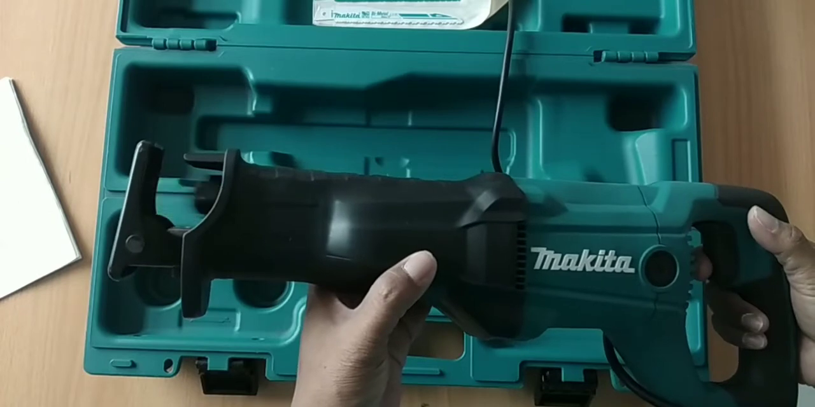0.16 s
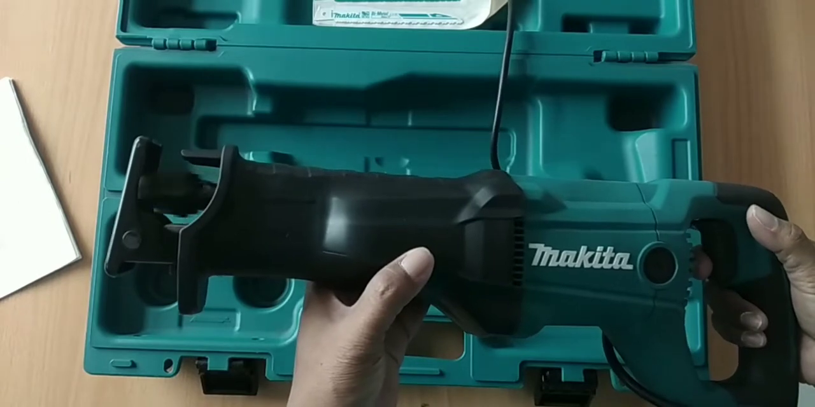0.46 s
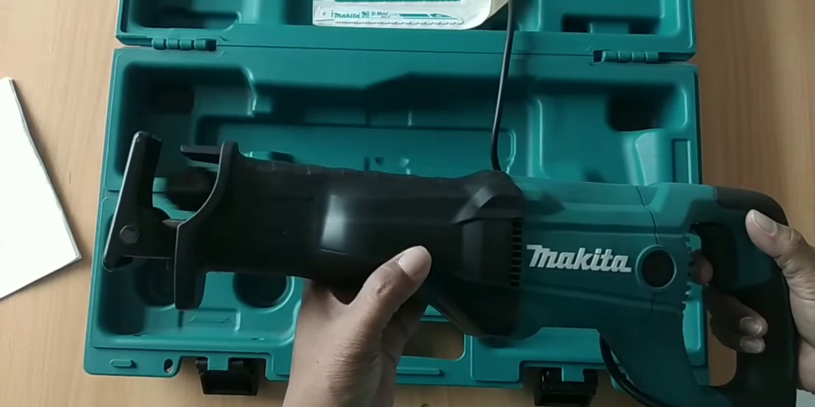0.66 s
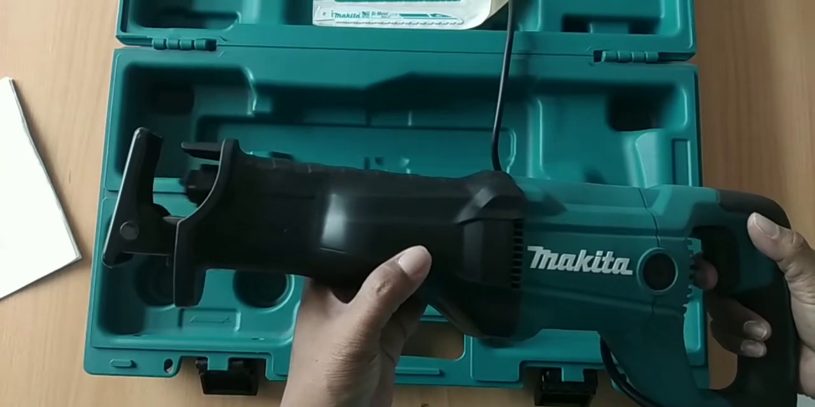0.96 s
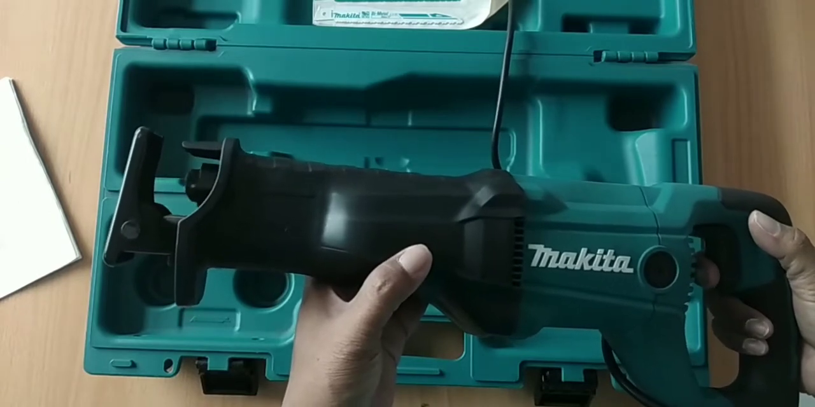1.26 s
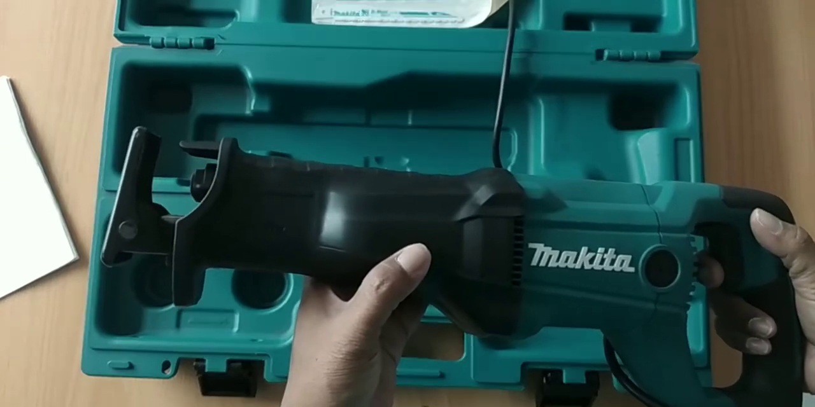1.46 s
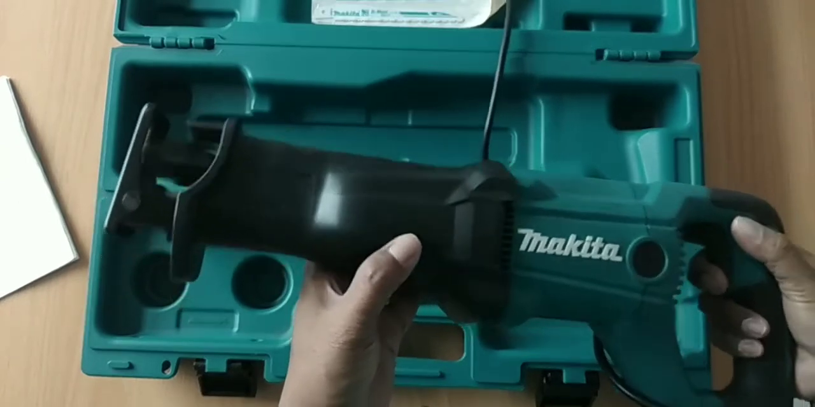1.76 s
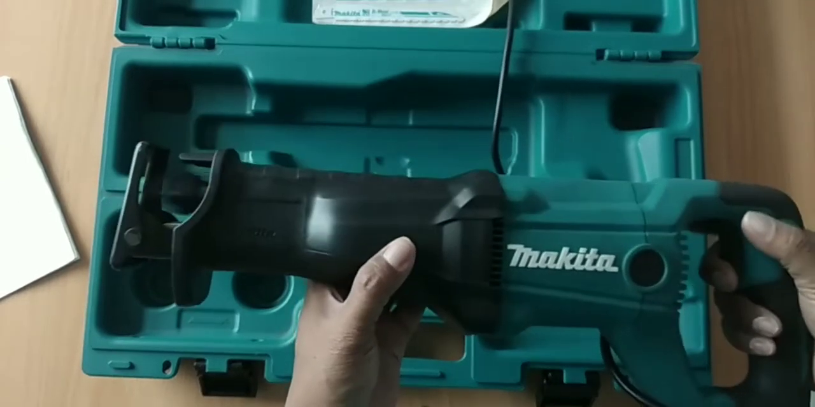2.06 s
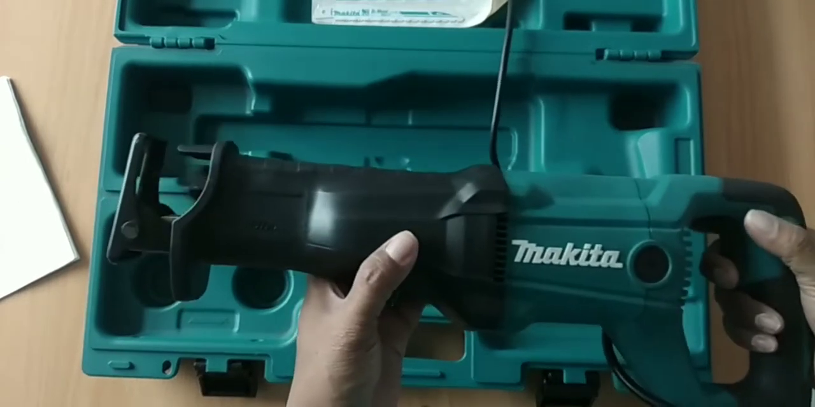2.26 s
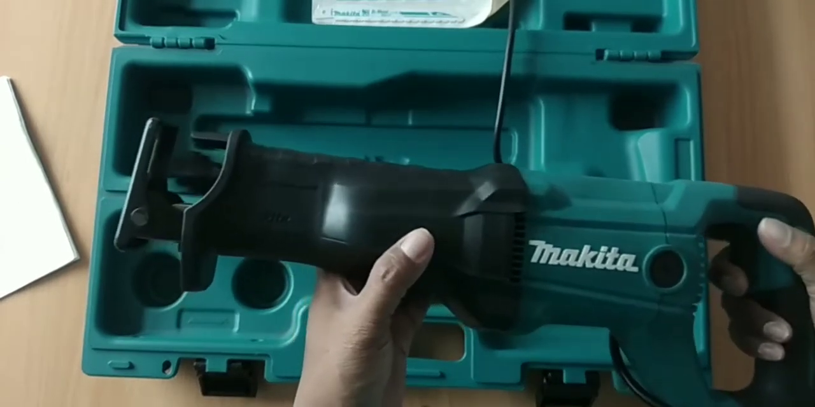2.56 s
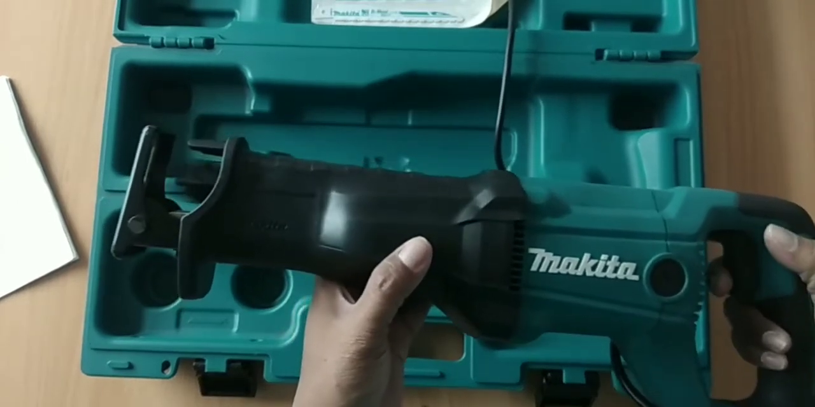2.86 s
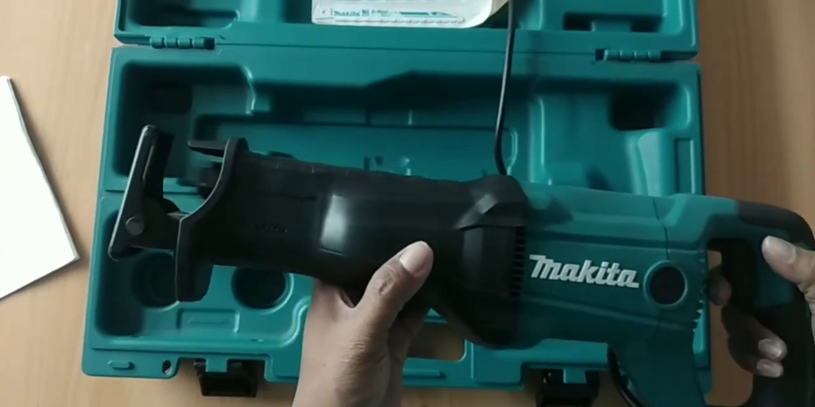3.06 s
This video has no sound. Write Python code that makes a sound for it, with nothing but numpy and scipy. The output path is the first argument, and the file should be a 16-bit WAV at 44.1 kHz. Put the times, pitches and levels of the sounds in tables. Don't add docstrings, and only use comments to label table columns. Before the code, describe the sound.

A bladeless reciprocating saw, very close in a small room, rattles down into sparse knocks and near quiet, then clicks on, roars up abruptly with airy hiss and whine, buffeting the stereo microphone mostly on the left.

```python
import sys
import numpy as np
from scipy import signal
from scipy.fft import rfft, irfft
from scipy.io import wavfile
from scipy.ndimage import uniform_filter1d

SR = 44100
rng = np.random.default_rng(int(sys.argv[2]) if len(sys.argv) > 2 else 0)


def materialize(psi):
    bounded = np.clip(np.atleast_2d(psi).T, -1, 1)
    quanta = np.round(bounded * 32767).astype(np.int16)
    wavfile.write(sys.argv[1], SR, quanta)


def rack_gain(trim_db):
    fader = np.asarray(trim_db, float)
    return 10 ** (fader / 20)


N = 141120
T = np.arange(N) / SR
HZ = np.fft.rfftfreq(512, 1 / SR)

# time_s, pitch_hz
MOTOR_SPEED = [(0, 6200), (.7, 3000), (1.3, 700), (1.5, 0), (1.56, 0), (1.62, 6500), (1.72, 12000),
               (1.82, 14500), (1.9, 15400), (2.0, 16150), (2.14, 16600), (2.27, 15750), (2.4, 14790),
               (2.53, 13860), (2.7, 12280), (2.86, 10700), (3.2, 7900)]
# time_s, level_db
DRIVE = [(0, -3), (.27, -9.5), (.6, -14.5), (.9, -20.5), (1.2, -34.5), (1.3, -44.5), (1.5, -89),
         (1.535, -37), (1.545, -29), (1.575, -19.5), (1.6, -9.5), (1.64, -2.5), (1.75, -1.5), (1.93, -1.5),
         (2.5, -1), (2.85, -1.5), (2.95, -2.5), (3.2, -2.5)]
# freq_hz, level_db
HISS_SPECTRUM = [(210, -29.5), (560, -4.5), (1300, -6), (2100, 2.5), (3300, -3.5), (6000, 1), (10000, 11.5),
                 (16000, 1)]
# freq_hz, share (dB per dB)
HISS_FOLLOW = [(200, 0.66), (1200, 0.9), (3500, 0.64), (7000, 0.94), (11000, 1.55), (16000, 3.1)]
# mode_hz, width_hz, level_db, drive_share (dB per dB)
HOUSING = [(357, 145, -20.5, 1.35), (653, 111, -12.5, 0.38), (1247, 154, -6, 0.34), (1474, 236, -4, 0.62),
           (2079, 114, -1.5, 0.6), (2310, 140, -8, 0.67), (3640, 510, -2.5, 0.94), (5270, 100, -5, 1.2),
           (6090, 127, 3.5, 1.37), (6980, 180, -5, 3.4), (7790, 860, 1.5, 2.5), (9800, 1100, -3, 1.12)]
# start_s, level_db, brightness (0-1)
KNOCKS = [(0.107, -11, 1), (.223, -10.5, 0.46), (.25, -17, .3), (.287, -12, 0.2), (0.357, -14, 0.4),
          (0.477, -15, 0.1), (0.538, -25, 0.4), (0.617, -13.5, 0.3), (.67, -14.5, 0.1), (.732, -15.5, 0.26),
          (.798, -31.5, 0.1), (0.835, -31.5, .1), (0.876, -31.5, .1), (.9, -18.5, 0), (0.92, -24, 0.1),
          (0.971, -23, 0.05), (1.033, -20, 0), (1.189, -35, 0.2), (1.281, -36, 0.12), (1.403, -37, 0.2),
          (1.476, -50, 0.8), (1.5377, -4.5, 0.17), (1.547, -30, 0.5), (1.555, -10.5, 0.34),
          (1.596, -7.5, 0), (1.645, -13, 0), (1.673, -18, 0)]
# order (multiple of commutator pitch), level_db, right_over_left_db (half the gap)
SHAFT_TONES = [
    (.137, -37, 0),
    (.04, -48, 2),
    (.0064, -54, 4),
]
# pitch_hz, level_db
COMMUTATOR_TONE = [(9500, -42), (10500, -26), (12200, -26), (13000, -34), (13900, -27), (14700, -24.5),
                   (15600, -24)]
# start_s, length_s, level_db, top_hz
LEFT_GUSTS = [(1.782, 0.031, -10.5, 500), (1.779, 0.045, -14, 170), (1.815, 0.052, -21.5, 408),
              (2.03, 0.065, -24, 400), (2.09, 0.14, -25.5, 366), (2.23, 0.052, -26, 303),
              (2.295, 0.045, -18.5, 518), (2.355, 0.036, -17.5, 455), (2.45, 0.047, -22.5, 520),
              (2.53, 0.061, -29, 300), (2.63, 0.032, -21.5, 505), (2.68, 0.0575, -23.5, 400),
              (2.76, 0.037, -18.5, 446), (2.8, 0.066, -23, 282), (2.86, 0.058, -22, 446),
              (2.91, 0.033, -22.5, 407)]
# start_s, length_s, level_db, top_hz
RIGHT_GUSTS = [
    (1.88, 0.046, -23.5, 204),
    (1.93, 0.17, -31.5, 120),
    (2.0, 0.28, -30.5, 151),
    (2.28, 0.084, -32, 120),
    (2.355, .04, -28, 150),
    (2.45, .15, -57, 120),
    (2.7, 0.24, -46, 120),
]
# freq_hz, gain_db
LEFT_PORT = [(1000, 1.5), (3300, -1.27), (5500, -2), (7700, 7), (9300, -9), (12000, -18.5), (14500, -3),
             (16000, -59)]
# freq_hz, gain_db
RIGHT_PORT = [(1000, 1), (3300, -4.5), (5500, -4.5), (8000, -5.8), (9600, -5.5), (11000, 4), (13000, 0.5),
              (16000, 6)]
# freq_hz, correlation (0-1)
PORT_LIKENESS = [(300, 1), (640, 0.78), (1410, 0.548), (3100, 0.25), (5500, 0.13), (8000, 0.22),
                 (11000, 0.76), (15000, 1)]
# freq_hz, phase_rad
PORT_PHASE = [(0, 0), (2150, .2), (3800, -.6), (4900, -1.5), (5700, -6.2), (7400, -11.3), (8400, -18.85),
              (15900, -18.85)]
# freq_hz, level_db
FLOOR_SPECTRUM = [(25, 3.5), (55, -4), (110, 0), (180, -7), (280, -9.5), (1200, -14.5), (6000, -21.5),
                  (16000, -27)]

HISS_DB, PATCHY_DB, FLICKER_DB, SWELL_DB = -12.5, 1.3, .9, .45
RATTLE_DB, RATTLE_FULL_DB, TEETH_PER_S, TOOTH_SPREAD_DB = -31, -8.5, 4500, 1.7
LASH_DB, LASH_HZ = 9.5, 10000
STROKE_DEPTH, STROKE_ORDER = .16, .00568
SLAP_AT_S, SLAP_DB, SLAP_SPREAD_DB, SLAP_S = 2.0005, -28, 2, .001
SLAP_SHARE, SLAP_WIDEN, SLAP_HZ = 1.67, 2.8, 2151
KNOCK_DB, KNOCK_BURST_S, KNOCK_TAIL_S, KNOCK_TAIL_DB = -2, .0028, .007, -18.5
FLOOR_DB, FLOOR_DUCK_DB, FLOOR_BACK_S = -51.5, -3, .46
HUM_HZ, HUM_DB, HUM_FROM_S, HUM_RISE_S = 263, -3.5, 1.0, .3
FLARE_S, FLARE_LENGTH_S, FLARE_HZ, FLARE_WIDTH_HZ, FLARE_DB = 1.577, .03, 6350, 450, -18.5
WHINE_FROM_HZ, WHINE_RISE_HZ, WHINE_SETTLES_S = 8000, 1500, 1.76
WAVER_DB, WHINE_PAN_DB = 2, 2.5
PUSH_S, PUSH_HZ, PUSH_DB = 1.777, 40.3, -10.5
GUST_FROM_HZ, SIDE_GUST_FROM_HZ = 300, 25
DRAUGHT_FROM_S, DRAUGHT_TO_S, DRAUGHT_DB, DRAUGHT_DROP_DB, DRAUGHT_HZ = 1.78, 2.95, -32, -5.5, 197
ROOM_DB, ROOM_T60_S, ROOM_GAP_S = -13, .18, .003
CEILING = .99


def evened(x):
    return x / np.sqrt(np.mean(abs(x) ** 2) + 1e-20)


def read(points, hz):
    f, value = np.transpose(points)
    return np.interp(np.log(hz + 1), np.log(f + 1), value)


def curve(points, t):
    return np.interp(t, *np.transpose(points))


def fade_in(start_s, rise_s):
    return np.clip((T - start_s) / rise_s, 0, 1)


def slow(t, rate_hz):
    rates = np.geomspace(rate_hz / 12, rate_hz, num=24)
    return evened(sum(np.sin(2 * np.pi * (f * t + rng.random())) / np.sqrt(f) for f in rates))


def ring(x, hz, width):
    r = np.exp(-np.pi * width / SR)
    poles = [1, -2 * r * np.cos(2 * np.pi * hz / SR), r * r]
    return signal.lfilter([(1 - r * r) / 2, 0, (r * r - 1) / 2], poles, x)


def ring_twice(x, hz, first_width, second_width):
    return ring(ring(x, hz, first_width), hz, second_width)


def at_ports(pair, gain_db):
    a, b = signal.stft(pair, nperseg=512, noverlap=384)[2]
    same = read(PORT_LIKENESS, HZ)[:, None]
    phase = np.exp(-1j * read(PORT_PHASE, HZ))[:, None]
    left_right = np.array([a, (same * a + np.sqrt(1 - same ** 2) * b) * phase])
    gain = rack_gain(gain_db(np.arange(a.shape[1]) * 128 / SR))
    return signal.istft(left_right * gain, nperseg=512, noverlap=384)[1][:, :N]


def reversals():
    turns = np.cumsum(STROKE_ORDER * curve(MOTOR_SPEED, T)) / SR
    return turns - np.interp(SLAP_AT_S, T, turns)


def strokes():
    return 1 + STROKE_DEPTH * np.cos(2 * np.pi * reversals() - 1)


def hiss():
    def level_db(t):
        grain = rng.standard_normal((len(t), len(HZ))).T
        patches = evened(uniform_filter1d(uniform_filter1d(grain, size=8, axis=0), size=14, axis=1))
        shared = FLICKER_DB * slow(t, 70) + SWELL_DB * slow(t, 12)
        driven = read(HISS_FOLLOW, HZ)[:, None] * curve(DRIVE, t)
        return HISS_DB + read(HISS_SPECTRUM, HZ)[:, None] + driven + PATCHY_DB * patches + shared
    return at_ports(rng.standard_normal((2, N)), level_db)


def rattle():
    strength = rack_gain(TOOTH_SPREAD_DB * np.minimum(rng.exponential(1, N), 5))
    teeth = strength * (rng.random(N) < TEETH_PER_S / SR) * strokes()
    teeth = evened(uniform_filter1d(teeth, size=6) * rng.standard_normal((2, N)))
    drive = np.minimum(curve(DRIVE, T) - RATTLE_FULL_DB, 0)
    lash = np.clip(1 - curve(MOTOR_SPEED, T) / LASH_HZ, 0, 1)
    body = np.zeros((2, N))
    for hz, width, db, share in HOUSING:
        mode = evened(ring_twice(teeth, hz, 1.63 * width, 4.65 * width))
        body += mode * rack_gain(db + share * (drive + LASH_DB * lash))
    return at_ports(body, lambda t: RATTLE_DB)


def slaps():
    turns = reversals() + 0.033 * slow(T, 40)
    hits = np.diff(np.floor(turns), prepend=np.floor(turns[0])) > 0
    strength = hits * rack_gain(SLAP_SPREAD_DB * rng.standard_normal(N))
    blows = signal.lfilter([1], [1, -np.exp(-1 / (SLAP_S * SR))], strength)
    blows = blows * (np.cos(2 * np.pi * SLAP_HZ * T) + 0.59 * rng.standard_normal((2, N)))
    body = sum(rack_gain(db) * ring_twice(blows, hz, SLAP_WIDEN * width, 950) / np.sqrt(width)
               for hz, width, db, _ in HOUSING[2:6])
    return at_ports(evened(body) * rack_gain(SLAP_SHARE * curve(DRIVE, T)), lambda t: SLAP_DB)


def floor():
    spectrum = rfft(rng.standard_normal((2, N))) * rack_gain(read(FLOOR_SPECTRUM, np.fft.rfftfreq(N, 1 / SR)))
    hum = rack_gain(HUM_DB) * evened(ring_twice(rng.standard_normal(N), HUM_HZ, 50, 50))
    hum = hum * fade_in(HUM_FROM_S, HUM_RISE_S)
    held = np.clip((FLOOR_BACK_S - T) / 0.055, 0, 1)
    return rack_gain(FLOOR_DB + FLOOR_DUCK_DB * held) * (evened(irfft(spectrum, N)) + hum)


def knocks():
    blows = np.zeros((2, N))
    for start, db, bright in KNOCKS:
        t = np.maximum(T - start, 0)
        decay = np.exp(-t / KNOCK_BURST_S) + rack_gain(KNOCK_TAIL_DB) * np.exp(-t / KNOCK_TAIL_S)
        blows += (T >= start) * rack_gain(db) * decay * np.array([[1], [bright]])
    noise = rng.standard_normal((2, N))
    dull, sharp = blows[0] * noise, blows[1] * noise
    low = sum(rack_gain(db) * ring(dull, hz, 1.09 * width) for hz, width, db, _ in HOUSING[1:6])
    high = sum(rack_gain(db) * ring(sharp, hz, 2.0 * width) for hz, width, db, _ in HOUSING[6:])
    high = high + .05 * sharp
    return at_ports(rack_gain(11.5) * low + rack_gain(2.5) * high, lambda t: KNOCK_DB)


def flare():
    shape = np.sin(np.pi * fade_in(FLARE_S, FLARE_LENGTH_S) ** 1.3)
    noise = ring_twice(rng.standard_normal((2, N)), FLARE_HZ, FLARE_WIDTH_HZ, FLARE_WIDTH_HZ)
    return at_ports(shape * evened(noise), lambda t: FLARE_DB)


def whine():
    speed = uniform_filter1d(curve(MOTOR_SPEED, T), size=1500) * (1 + 0.00041 * slow(T, 40))
    on = np.clip((speed - WHINE_FROM_HZ) / WHINE_RISE_HZ, 0, 1) * fade_in(WHINE_SETTLES_S, .06)
    out = np.zeros((2, N))
    for order, db, pan_db in SHAFT_TONES + [(1, read(COMMUTATOR_TONE, speed), WHINE_PAN_DB)]:
        tone = np.sqrt(2) * np.sin(2 * np.pi * order * np.cumsum(speed) / SR)
        tone = tone * rack_gain(db + WAVER_DB * slow(T, 24.97)) * on
        out += tone * rack_gain(np.array([[-pan_db], [pan_db]]))
    return out


def push():
    return -rack_gain(PUSH_DB) * np.sin(2 * np.pi * np.clip((T - PUSH_S) * PUSH_HZ, 0, 1))


def lowpassed(x, hz):
    return evened(signal.lfilter(*signal.butter(3, hz, fs=SR), x))


def buffet(gusts, from_hz, draught_db):
    noise, out = rng.standard_normal((2, N)), np.zeros(N)
    puff = signal.lfilter([1], [1, -.97], noise[0])
    puff = signal.lfilter(*signal.butter(1, from_hz, "high", fs=SR), puff)
    for start, length, db, top_hz in gusts:
        shape = np.sin(np.pi * fade_in(start, length) ** 0.68)
        gust = shape * lowpassed(puff, top_hz)
        out += rack_gain(db) * gust * np.sqrt(np.sum(shape ** 2) / np.sum(gust ** 2))
    deep = lowpassed(signal.lfilter([1], [1, -.98], noise[1]), DRAUGHT_HZ)
    level_db = draught_db + DRAUGHT_DROP_DB * (T > DRAUGHT_TO_S) + 1.8 * slow(T, 20)
    return out + rack_gain(level_db) * fade_in(DRAUGHT_FROM_S, .05) * deep


def room(x):
    t = np.arange(SR // 4) / SR
    tail = rng.standard_normal((2, len(t))) * rack_gain(-60 * t / ROOM_T60_S) * (t > ROOM_GAP_S)
    return x + rack_gain(ROOM_DB) * signal.fftconvolve(x, tail / np.linalg.norm(tail[0]), axes=1)[:, :N]


def ports(x):
    hz = np.fft.rfftfreq(N, 1 / SR)
    return irfft(rfft(x) * rack_gain(np.array([read(LEFT_PORT, hz), read(RIGHT_PORT, hz)])), N)


def scene():
    saw = hiss() + rattle() + slaps() + knocks() + flare()
    left_air = push() + buffet(LEFT_GUSTS, GUST_FROM_HZ, DRAUGHT_DB)
    right_air = buffet(RIGHT_GUSTS, SIDE_GUST_FROM_HZ, DRAUGHT_DB - 24)
    return ports(room(saw)) + whine() + np.array([left_air, right_air]) + floor()


def roll_off(x):
    return signal.sosfilt(signal.butter(12, 15770, fs=SR, output="sos"), x)


def record(dry):
    mix = np.clip(dry, -CEILING, CEILING)
    return roll_off(mix)


dry = scene()
out = record(dry)
materialize(out)
```